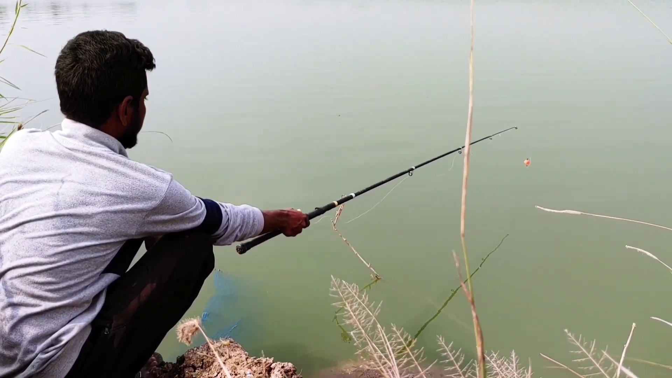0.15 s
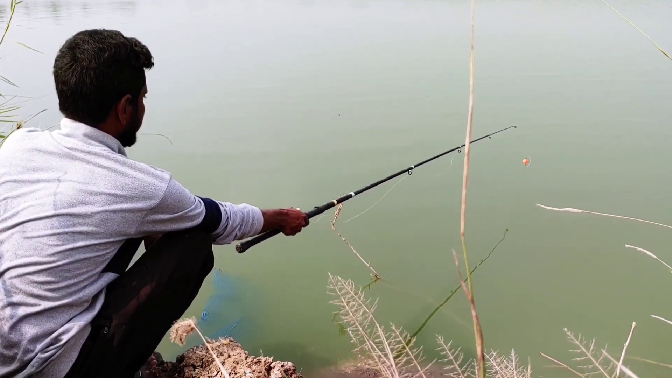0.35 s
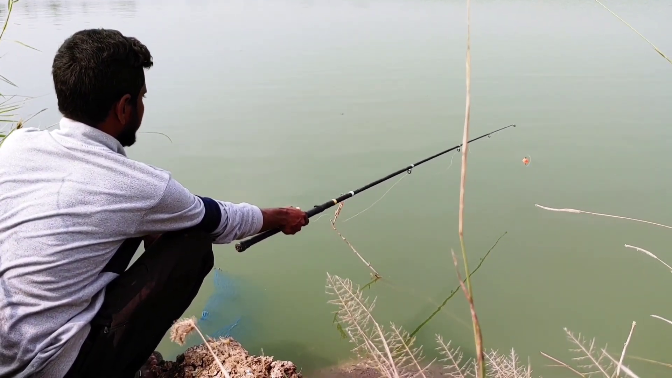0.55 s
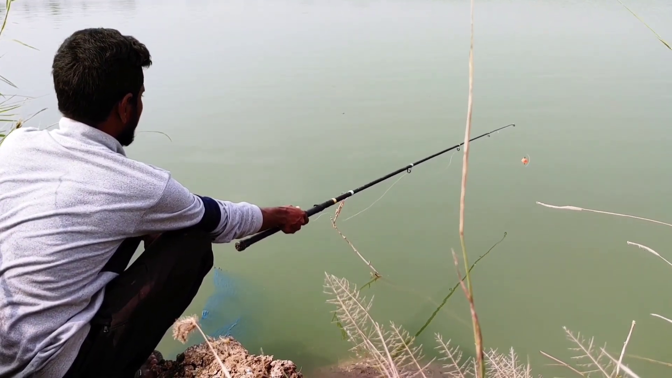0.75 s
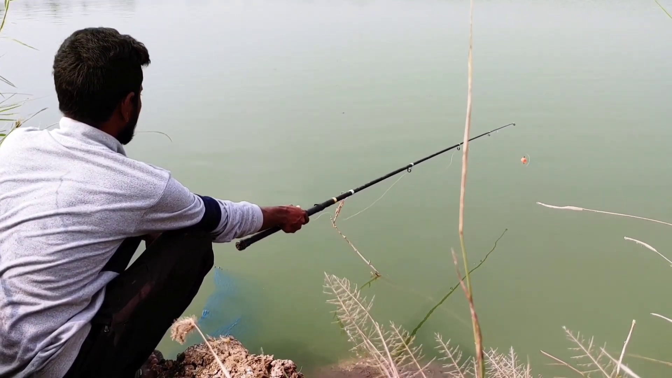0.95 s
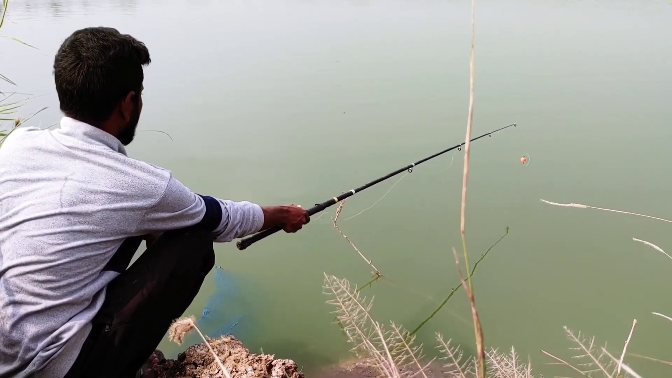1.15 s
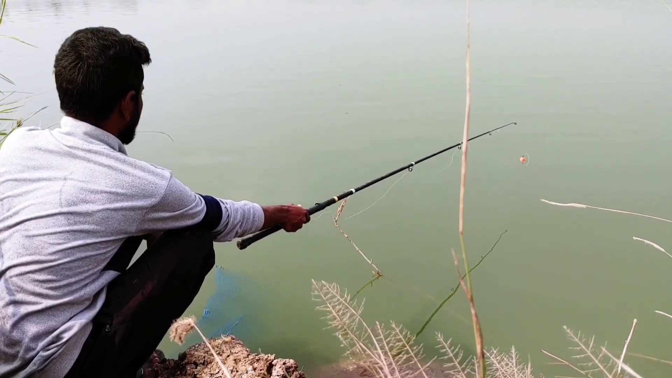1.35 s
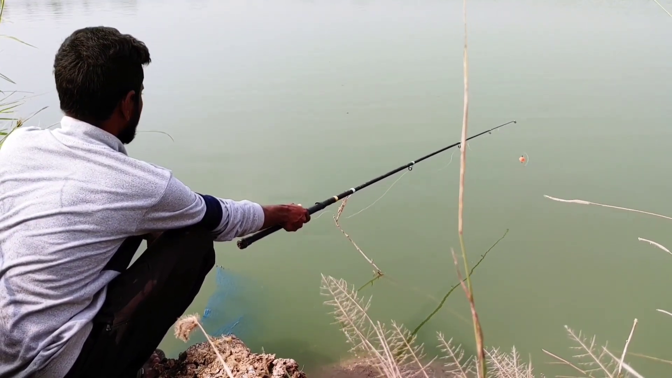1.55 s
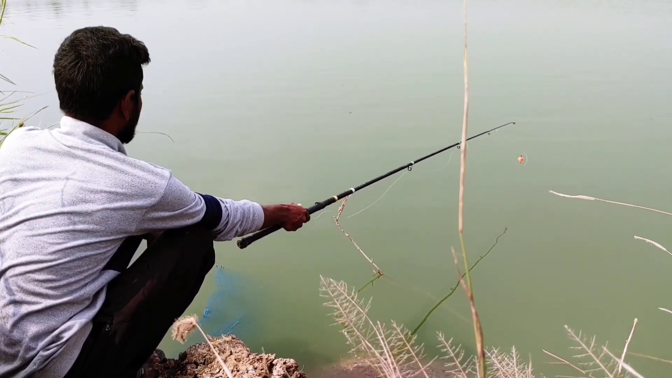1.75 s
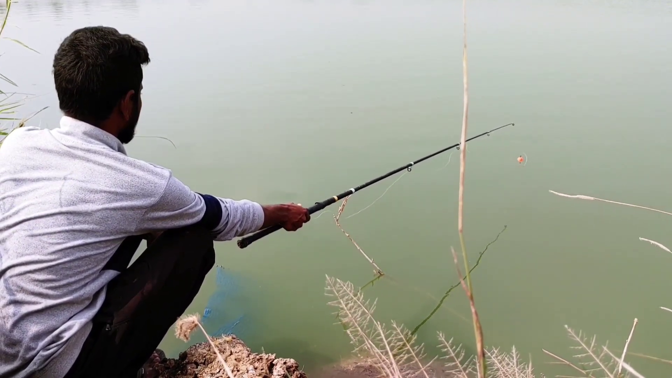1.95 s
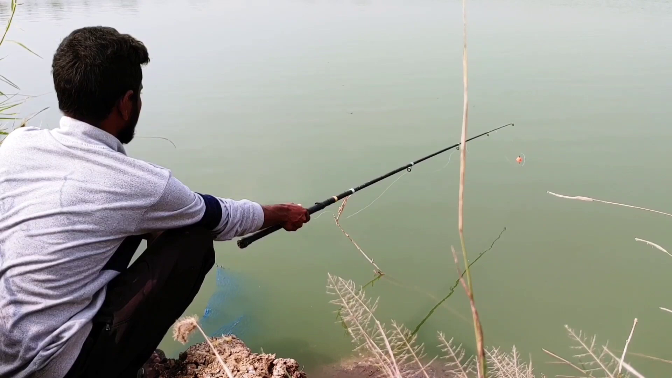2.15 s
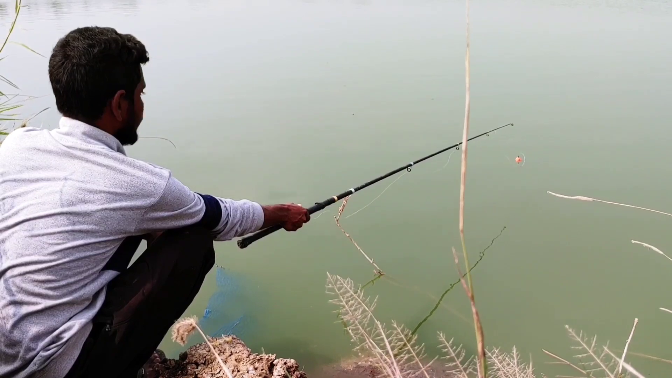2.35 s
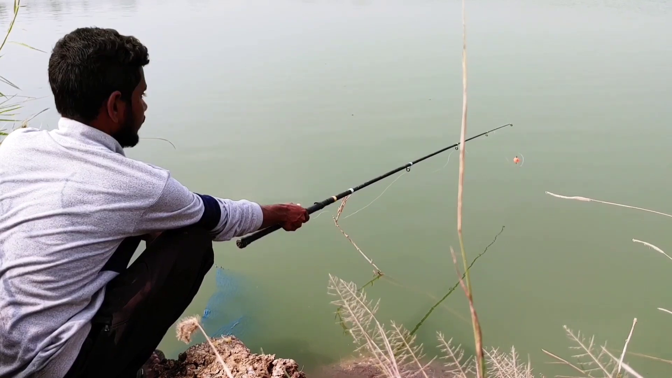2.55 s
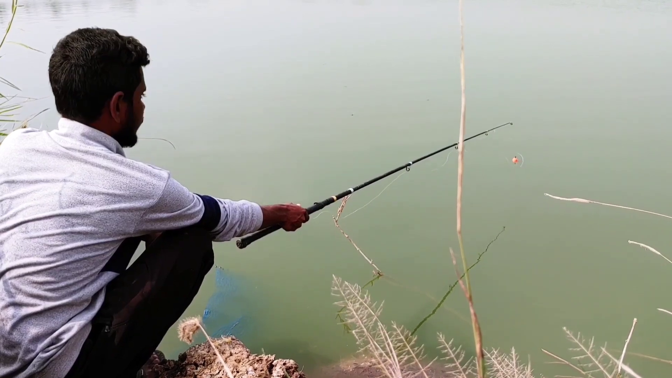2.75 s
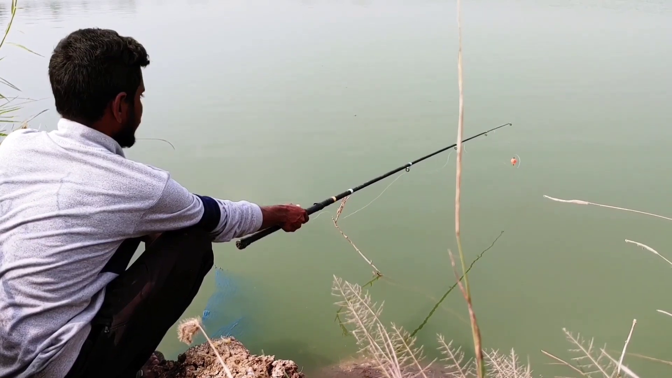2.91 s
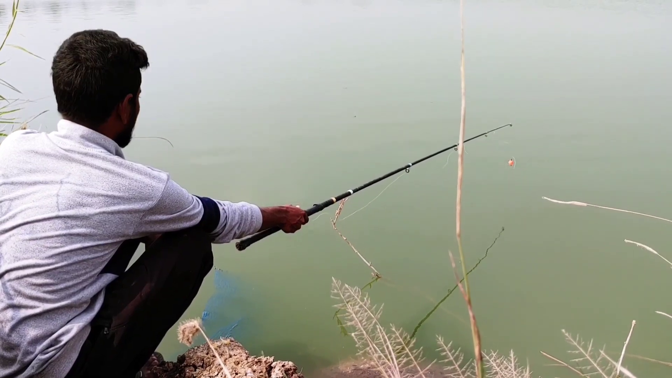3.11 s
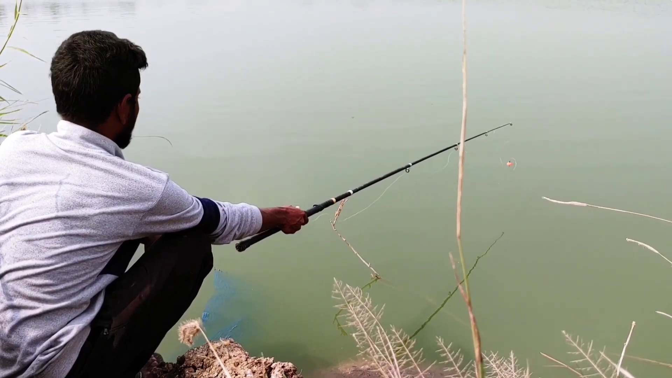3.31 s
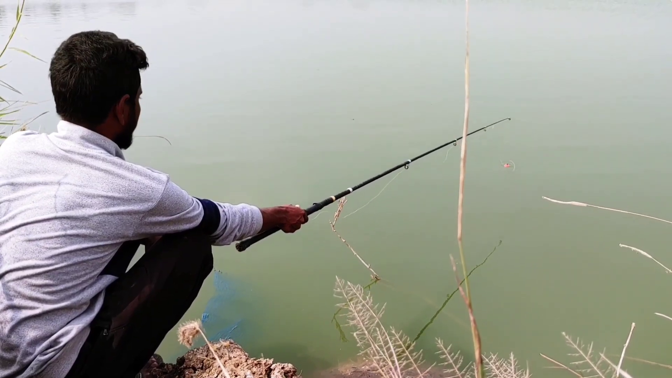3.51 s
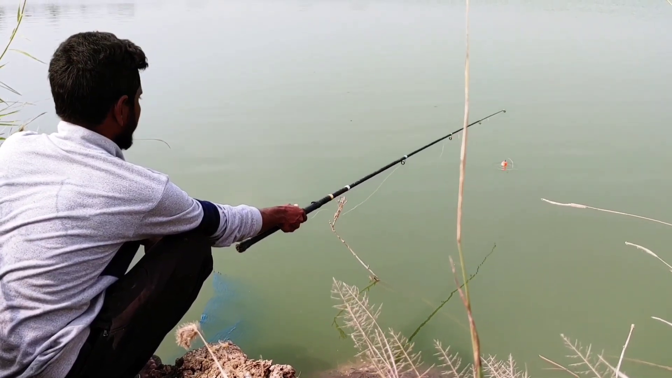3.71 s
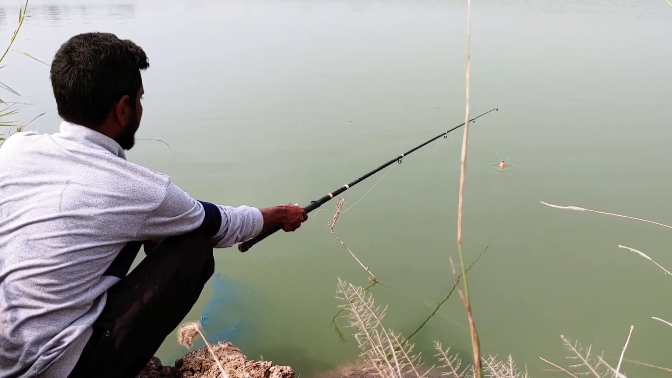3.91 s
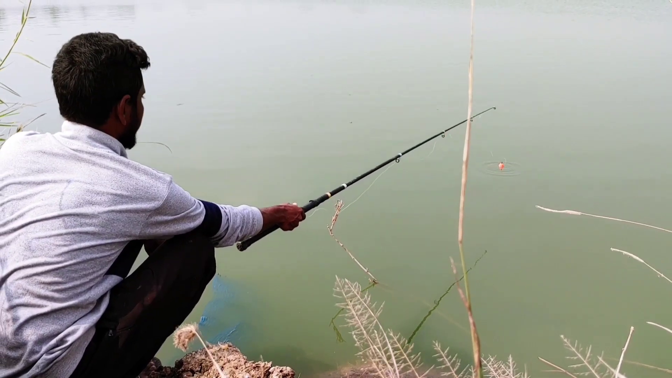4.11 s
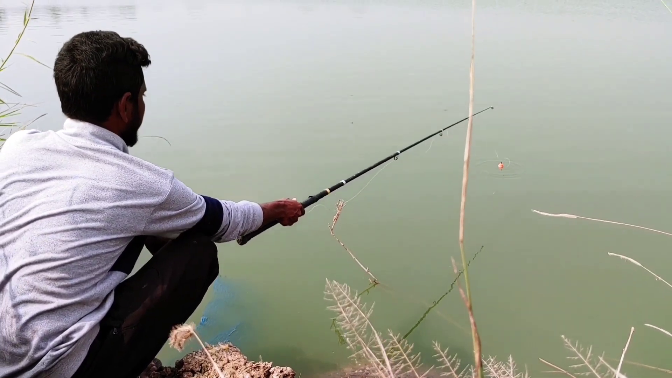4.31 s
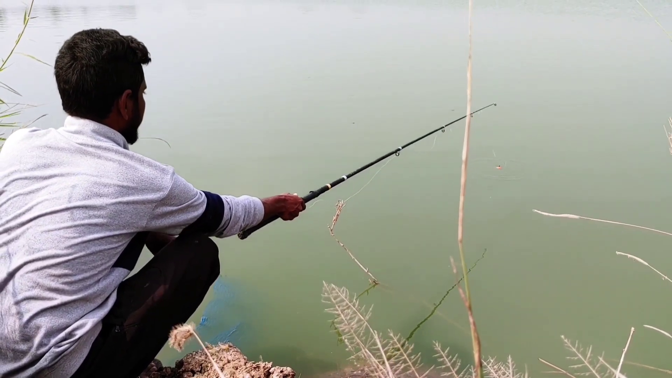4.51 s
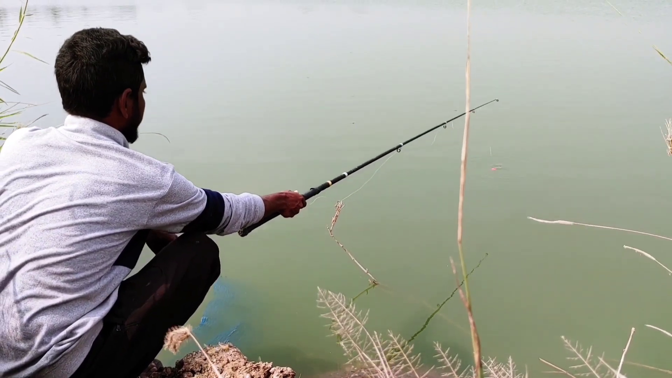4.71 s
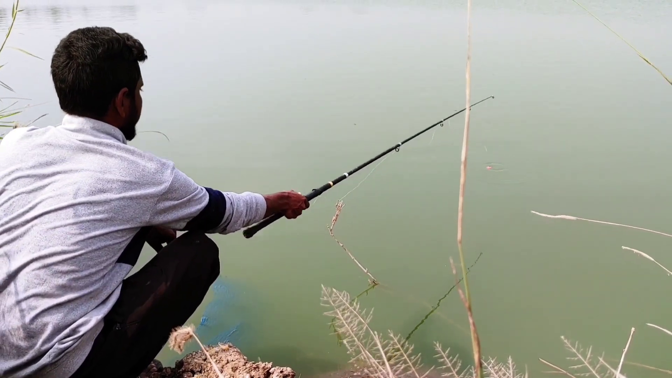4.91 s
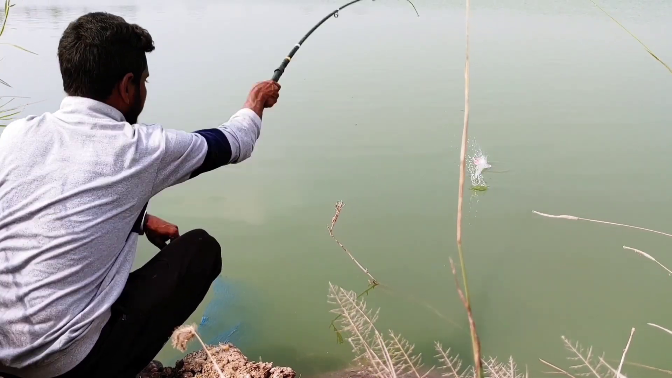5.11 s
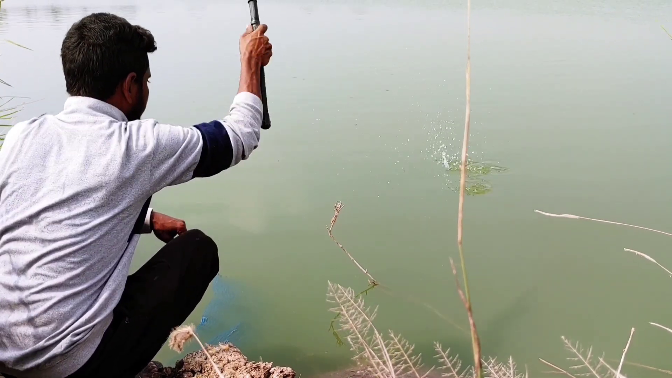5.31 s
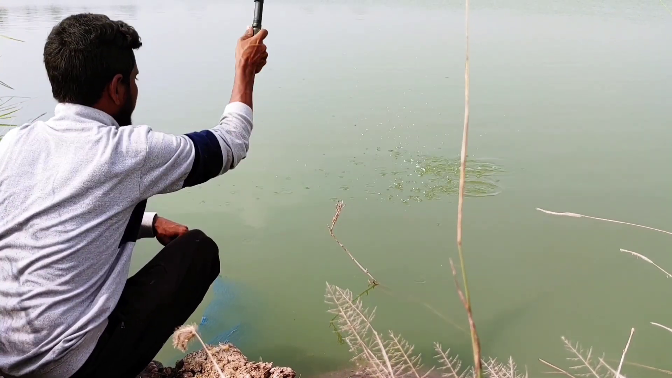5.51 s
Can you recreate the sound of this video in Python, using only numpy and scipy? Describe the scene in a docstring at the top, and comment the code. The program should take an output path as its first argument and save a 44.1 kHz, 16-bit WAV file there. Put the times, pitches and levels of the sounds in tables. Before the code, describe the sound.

Outdoors at a calm lake, a soft low rumble, distant engine hum and airy hiss run throughout. Faint birds twitter in the first second. Near two and three seconds, water splashes, plops and drips close on the right, then eases. Around five seconds a line tears from the water ahead in several crisp, louder splashes. Stereo microphone near the bank.

```python
"""Water splashes at a quiet lake edge: bubble clouds and torn-water hiss gulp, froth and spray.
It is stirred at the bank off to the right, with ringing plops and dripping drops.
Then an angler strikes, and the line tears out of the lake ahead in a few sharp splashes.
Behind it lie a low distant rumble of filtered noise with a far engine's hum of sines, soft airy noise,
and twittering birds made of warbled and falling tones."""
import sys
import numpy as np
from scipy import signal
from scipy.fft import rfft, irfft, next_fast_len
from scipy.io import wavfile
from scipy.ndimage import uniform_filter1d, map_coordinates

SR = 44100
rng = np.random.default_rng(int(sys.argv[2]) if len(sys.argv) > 2 else 0)


def master(y):
    """Save y as 16-bit WAV."""
    cut = np.clip(np.atleast_2d(y).T, -1, 1)
    pcm = np.round(cut * 32767)  # scale
    wavfile.write(sys.argv[1], SR, pcm.astype(np.int16))


N = 245240
STRIKE_S = 4.8  # the water sounds at the bank before the strike, around the line from then on
# Spells of churning water. Each row: start in seconds, end in seconds, spray level in dB,
# depth (gulp over spray) in dB, sag in dB per second.
CHURN_SPELLS = [(1.88, 2.68, -52.5, 1, 9.5), (3.17, 3.61, -52.5, -5.5, 0), (3.68, 3.95, -68.5, -20, -16.5),
                (4.03, 4.38, -65, -11, 2), (5.03, 5.56, -49.5, -7, 2.5)]


def amp(db):
    """Decibels to gain."""
    return 10 ** (np.asarray(db) / 20)


def unit(x):
    """Scale so that the centre of the image has rms 1."""
    centre = np.atleast_2d(x).mean(0)
    return x / np.sqrt(np.mean(centre ** 2) + 1e-20)


def along(points, hz):
    """Read a curve of (Hz, value) points on a log frequency axis."""
    f, v = np.transpose(points)
    return np.interp(np.log(hz + 1), np.log(f + 1), v)


def wobble(rate):
    """A smooth random curve through the given number of knots a second."""
    knots = rng.standard_normal(int(N * rate / SR) + 4)
    return map_coordinates(knots, [np.arange(N) * rate / SR])


def filtered(x, response):
    """Shape x by a complex response of frequency."""
    m = next_fast_len(N + SR // 2)
    return irfft(rfft(x, m) * response(np.fft.rfftfreq(m, 1 / SR)), m)[..., :N]


def band(hz, lo, hi, order=6):
    """Gain of a soft-edged pass band."""
    low_edge = 1 + (lo / (hz + 1)) ** (2 * order)
    high_edge = 1 + (hz / hi) ** (2 * order)
    return 1 / np.sqrt(low_edge * high_edge)


def add(track, s, sound):
    """Lay a sound into a track at time s in seconds."""
    part = track[max(round(s * SR), 0):][:len(sound)]
    part += sound[:len(part)]


def background():
    """Distant rumble and an engine's steady hum reach both ears nearly alike; the soft air does not."""
    # Colour of the rumble. Each row: frequency in Hz, level in dB per Hz.
    rumble_colour = [(20, -10), (35, -16), (60, -4.5), (110, -4), (160, -4), (200, -12.5), (260, -15.5),
                     (400, -23), (650, -52)]
    # The far engine's overtones. Each row: frequency in Hz, level in dB.
    overtones = [(57.7, -70), (72.2, -80.5), (101, -67), (144.3, -61), (173.2, -64), (230.9, -76.5)]
    # Colour of the air. Each row: frequency in Hz, level in dB per Hz.
    air_colour = [(210, -4), (350, -6), (480, -6), (600, -4.5), (1510, -13), (1850, -14), (2580, -15),
                  (6380, -20.5), (7360, -30.5), (10800, -17.5), (15500, -24.5)]
    # Stereo lean of the air. Each row: frequency in Hz, left over right in dB.
    air_lean = [(60, -5), (180, -5), (550, -3), (1650, -0.5), (4970, -4.5), (15000, -3)]
    rumble_db, air_db = -58.5, -63

    low = rng.standard_normal(N) + 0.22 * rng.standard_normal((2, N))
    rumble = unit(filtered(low, lambda hz: amp(along(rumble_colour, hz))))
    rumble = amp(rumble_db + 1.1 * wobble(2.6)) * rumble

    t = np.arange(N) / SR + 0.0004 * wobble(2.9)  # the engine's speed drifts a little
    hum = sum(amp(db) * np.sin(2 * np.pi * (hz * t + rng.random())) for hz, db in overtones)
    hum = amp(wobble(2.97)) * hum

    wide = 0.25 * rng.standard_normal(N) + rng.standard_normal((2, N))
    ears = np.array([[.5], [-.5]])
    air = unit(filtered(wide, lambda hz: amp(along(air_colour, hz) + ears * along(air_lean, hz))))
    return rumble + hum + amp(air_db + 0.95 * wobble(3.0)) * air


def scattered(x, t60):
    """Diffuse answer of bank and reeds: a decaying noise tail, different at each ear."""
    t = np.arange(SR // 3) / SR
    tail = rng.standard_normal((2, len(t))) * amp(-60 * t / t60)
    tail = tail / np.linalg.norm(tail, axis=1, keepdims=True)
    return signal.fftconvolve(np.atleast_2d(x), tail, axes=1)[:, :N]


def bird(warble_hz=65):
    """Short warbled notes and a few thin falling whistles, softened by distance."""
    # Overlapping notes. Each row: start in seconds, length in seconds, pitch in Hz,
    # level in dB ahead of the distance gains.
    note_rows = [(.055, .07, 2430, -62.5), (.11, 0.12, 2890, -65), (.135, 0.054, 2660, -61),
                 (.285, 0.046, 2820, -59.5), (.3, 0.16, 2540, -65), (.49, 0.076, 2830, -61),
                 (.575, 0.082, 2440, -62), (.61, 0.05, 2780, -64), (.79, 0.065, 2800, -64),
                 (.865, 0.067, 2460, -57), (.91, 0.066, 2750, -65), (.97, 0.043, 2810, -61),
                 (1.07, 0.104, 2775, -67)]
    # Far whistles. Each row: start in seconds, length in seconds, starting pitch in Hz,
    # fall over the length in Hz, level in dB ahead of the distance gains.
    whistle_rows = [(1.762, 0.08, 3785, 230, -60), (2.27, 0.08, 2056, 140, -50),
                    (2.43, 0.057, 2020, 140, -49), (2.48, 0.15, 2090, 430, -54.5),
                    (3.98, 0.46, 1424, 9.5, -64)]
    song = np.zeros(N)
    level_notes = [(s, span, hz, 0, db) for s, span, hz, db in note_rows]
    for rows, warble in ((level_notes, warble_hz), (whistle_rows, 0)):
        for s, span, hz, fall_hz, db in rows:
            t = np.arange(int(span * SR)) / SR
            flutter = np.interp(t, np.linspace(0, span, 24), rng.standard_normal(24))
            vibrato = np.sin(2 * np.pi * (30 * t + rng.random()))
            pitch = hz - fall_hz * t / span + warble * (vibrato + flutter)
            tone = np.sin(2 * np.pi * np.cumsum(pitch) / SR)
            add(song, s, amp(db) * np.hanning(len(t)) * tone)
    return .35 * song + .7 * scattered(song, t60=.3)


def glancing(x, t60):
    """Short reflections off moving water, never twice the same and different at each ear."""
    z = signal.stft(x, nperseg=1024)[2]
    decay = amp(-60 * np.arange(2 * z.shape[-2] - 2) / SR / t60)
    # a fresh random tail for every frame and ear
    tails = rng.standard_normal((2, z.shape[-1], len(decay))) * decay / np.linalg.norm(decay)
    return signal.istft(z * rfft(tails).swapaxes(1, 2))[1][:, :N]


def placed(x, lag_ms, balance, near_db):
    """The direct sound reaches the left ear lag_ms later; close ground and far bank answer."""
    ears = np.array([[.5], [-.5]])
    direct = filtered(x, lambda hz: np.exp(-2j * np.pi * hz * ears * lag_ms / 1000))
    # long waves pass round stones and reeds, short ones scatter
    short_waves = filtered(x, lambda hz: band(hz, 1300, SR, order=1))
    near = amp(near_db) * glancing(short_waves, t60=.016)
    far = amp(-23) * scattered(x, t60=.2)
    return filtered(direct + near + far, lambda hz: amp(ears * along(balance, hz)))


def at_bank(x):
    """Close by on the right: the right ear hears it earlier and mostly louder."""
    # Each row: frequency in Hz, left over right in dB.
    bank_lean = [(200, -0.5), (500, -2.5), (1000, -2.5), (1300, 2.5), (1900, 1.5), (2400, -5), (3400, 0.5),
                 (4300, -7), (5000, -10.5), (6200, -14.5), (8500, -1.5), (10800, -14.5), (15000, -10.5)]
    return placed(x, lag_ms=0.394, balance=bank_lean, near_db=0.0)


def at_line(x):
    """Out on the water ahead: almost no lag between the ears."""
    # Each row: frequency in Hz, left over right in dB.
    line_lean = [(200, -0.5), (700, -4), (1100, -4), (1700, -2), (2500, -5), (3600, -2.5), (5000, -13.5),
                 (6500, -7), (8300, -5), (11000, -12), (15000, -7)]
    return placed(x, lag_ms=-0.03, balance=line_lean, near_db=4.0)


def churning(churns):
    """Spray level and depth of each spell in dB: it builds up, sags or swells, and dies away."""
    attack_s, release_s = 0.077, 0.25  # each over 20 dB
    settling = 3.6  # large bubbles react most: depth changes this many times as fast as the spray
    t = np.arange(N) / SR
    for start, end, db, depth_db, sag in churns:
        sunk = sag * np.clip(t - start, 0, end - start)
        outside = np.maximum(start - t, 0) / attack_s + np.maximum(t - end, 0) / release_s
        yield db - sunk - 20 * np.minimum(outside, 10), depth_db - settling * sunk


def light_drops(scatter_db=4):
    """Drops fall at uneven gaps, as heavy as the water churns: rows laid out like the heavy drops."""
    drips_per_s = 18
    ring_db, tick_db = 10, 2  # over the spray level, ahead of the trims in plops_and_drips
    middle_hz, pitch_spread = 4400, 0.14  # the spread is relative
    spray_db = np.max([db for db, _ in churning(CHURN_SPELLS)], axis=0)
    count = int(drips_per_s * N / SR)
    slip, size = rng.random((count, 2)).T
    s = (np.arange(count) + slip) / drips_per_s
    hz = middle_hz * np.exp(pitch_spread * rng.standard_normal(count))
    db = spray_db[(s * SR).astype(int)] + scatter_db * (2 * size - 1)
    return list(zip(s, hz, db + ring_db, db + tick_db))


def plops_and_drips(glide=2, onset=0.00084, drip_t60=0.0059, tick_t60=0.007, drip_glide=4):
    """Trapped air rings and rises in pitch; a drop ticks on the surface and leaves a tiny bubble."""
    # Single ringing bubbles. Each row: start in seconds, pitch in Hz, level in dB ahead of a 2 dB trim.
    bubbles = [(1.358, 620, -46.5), (1.824, 255, -41.5), (1.864, 923, -25.5), (1.869, 312, -35),
               (1.871, 690, -32), (1.888, 547, -30.5), (1.894, 322, -29.5), (1.936, 380, -40),
               (1.964, 376, -39), (1.971, 699, -38), (2.001, 2165, -37), (2.012, 2260, -39),
               (2.083, 2360, -38.5), (2.205, 690, -44), (2.706, 4970, -36.5), (3.112, 390, -38.5),
               (3.147, 690, -37.5), (3.164, 1165, -35.5), (3.18, 265, -39.5), (3.187, 730, -43),
               (3.203, 194, -45), (3.246, 267, -38.5), (3.28, 210, -44), (3.291, 2160, -29.5),
               (3.294, 1012, -42), (3.296, 710, -48), (3.338, 699, -40), (3.339, 910, -40),
               (3.376, 595, -37), (3.387, 357, -42), (3.448, 284, -44), (3.489, 228, -40),
               (3.503, 251, -42), (3.542, 360, -40), (3.561, 306, -40.5), (3.591, 310, -44),
               (5.067, 1770, -24), (5.071, 635, -28), (5.072, 256, -35.5), (5.077, 1520, -26),
               (5.081, 2637, -22), (5.084, 984, -24.5), (5.093, 1970, -26), (5.125, 1070, -35),
               (5.149, 1144, -29), (5.182, 1820, -35.5), (5.185, 1610, -31.5), (5.338, 217, -42.5)]
    # The heaviest drops. Each row: start in seconds, pitch in Hz, ring level in dB ahead of a 7 dB trim,
    # tick level in dB ahead of a 5 dB trim.
    heavy_drops = [(1.861, 6100, -34, -12), (2.0216, 4760, -29, -50), (2.1335, 4780, -39, -34),
                   (2.1458, 4390, -34, -33), (2.1944, 4560, -23, -33), (2.2708, 4700, -20.5, -30),
                   (2.4441, 4600, -34, -52), (2.4753, 4390, -39, -31), (2.6607, 4220, -28, -50),
                   (3.0086, 4520, -40, -21.5), (3.0205, 4500, -16, -46), (3.1178, 4450, -31, -46),
                   (3.147, 5190, -35, -53), (3.2378, 4500, -32, -17.5), (3.2703, 4360, -22, -43),
                   (3.2859, 4565, -16.5, -40), (3.3357, 4050, -21, -47), (3.4331, 4320, -21, -44),
                   (3.5392, 4500, -25.5, -36), (3.6006, 4435, -25.5, -51), (3.644, 4580, -19, -51),
                   (3.8567, 4730, -32.5, -45), (4.3384, 4750, -36.5, -45), (5.015, 5000, -48, -32),
                   (5.068, 4800, -12, -19), (5.243, 4870, -36, -42), (5.289, 4860, -24, -24),
                   (5.312, 5630, -36, -25), (5.3586, 6180, -4.5, -16), (5.419, 4920, -23, -29.5),
                   (5.433, 6600, -29, -37), (5.458, 5500, -29, -31)]
    bank, line = np.zeros(N), np.zeros(N)
    t = np.arange(SR // 6) / SR
    for s, hz, db in bubbles:
        # a 1 kHz bubble rings 0.049 s down to -60 dB; smaller, higher ones die sooner
        t60 = 0.049 * (1000 / hz) ** 0.63
        ring = np.sin(2 * np.pi * hz * t * (1 + glide * t)) * (1 - np.exp(-t / onset))
        add(bank if s < STRIKE_S else line, s, amp(db - 2.0 - 60 * t / t60) * ring)
    highs = signal.butter(2, [3400, 15500], "bandpass", fs=SR, output="sos")
    for s, hz, db, tick_db in list(heavy_drops) + light_drops():
        hiss = signal.sosfilt(highs, rng.standard_normal(len(t)))
        tick = hiss * amp(tick_db - 5 - 60 * t / tick_t60)
        tone = np.sin(2 * np.pi * hz * t * (1 + drip_glide * t))
        ring = tone * amp(db - 7.0 - 60 * t / drip_t60)
        add(bank if s < STRIKE_S else line, s, (tick + ring) * (1 - np.exp(-t / 0.00014)))
    return at_bank(bank) + at_line(line)


def bubble_cloud(rate, lo_hz, hi_hz, cycles, spread_db, hiss, width):
    """Many small bubbles, each a damped rising tone, over the wider hiss of torn water."""
    count = int(rate * N / SR)
    when, size, strength = rng.random((count, 3)).T[:, :, None]
    hz = lo_hz * (hi_hz / lo_hz) ** size
    k = np.arange(min(int(cycles * SR / lo_hz), 2000))
    age = k * hz / SR / cycles  # 1 after the given number of cycles
    tone = np.sin(2 * np.pi * cycles * age * (1 + 0.031 * np.minimum(age, 2)))
    ring = tone * (1 - np.exp(-age * cycles))
    # most bubbles are weak and a few strong; the high ones are louder
    grain_db = -spread_db * np.log(1 - strength * 49 / 50) - 48.0 * age
    grains = hz / hi_hz * amp(grain_db) * ring
    places = ((when * N).astype(int) + k).ravel()
    cloud = unit(np.bincount(places, grains.ravel(), N)[:N])
    cloud = cloud + hiss * rng.standard_normal(N) + width * rng.standard_normal((2, N))
    # the flow keeps feeding the cloud, so its strength stays even from moment to moment
    power = uniform_filter1d(np.mean(cloud ** 2, axis=0), size=700)
    return cloud / np.sqrt(np.abs(power) + 1e-6)


def flow(churns, splashes):
    """Strength of gulp, froth and spray: churning spells plus splashes that swell and collapse."""
    rise_share = 0.32  # a splash swells in this share of the time it takes to fall by 20 dB
    depth_share = np.array([[1], [0.5], [0]])  # froth lies halfway from spray to gulp
    lift_db = np.array([[0], [-0.5], [0]])
    t = np.arange(N) / SR

    def layers(db, depth_db):
        return amp(db + depth_share * depth_db + lift_db)

    power = sum(layers(db, depth_db) ** 2 for db, depth_db in churning(churns))
    for crest, db, depth_db, length in splashes:
        away = np.maximum((crest - t) / rise_share, t - crest) / length
        power += (layers(db, depth_db) * amp(-20 * np.minimum(away, 10))) ** 2
    return np.sqrt(power)


def water(churns, splashes, colour, place):
    """Large bubbles gulp, middling ones froth, and fine spray fizzes on the surface."""
    gulp = bubble_cloud(rate=260, lo_hz=220, hi_hz=950, cycles=9, spread_db=3, hiss=.8, width=.45)
    froth = bubble_cloud(rate=1500, lo_hz=900, hi_hz=3600, cycles=16, spread_db=3.6, hiss=.9, width=.7)
    spray = bubble_cloud(rate=3200, lo_hz=3500, hi_hz=13000, cycles=18, spread_db=4.6, hiss=.85, width=.8)
    edges_hz = [(170, 900), (900, 3500), (3500, 17000)]
    layers = []
    for cloud, (lo, hi) in zip((gulp, froth, spray), edges_hz):
        coloured = filtered(cloud, lambda hz: amp(along(colour, hz)) * band(hz, lo, hi))
        layers.append(unit(place(coloured)))
    clumps = amp(0.19 * wobble(110))  # water falls back in uneven lumps
    return clumps * sum(strength * layer for strength, layer in zip(flow(churns, splashes), layers))


def scene():
    """Water stirs at the bank before the strike and around the line after it, over the open air."""
    # A deep splash gulps, a shallow one only sprays. Each row: crest in seconds, spray level in dB,
    # depth (gulp over spray) in dB, time to fall by 20 dB in seconds.
    splashes = [(.42, -66.5, 3, 0.12), (.455, -64, 8, 0.013), (1.868, -33, -9.5, 0.082),
                (1.899, -45.5, 6, 0.053), (2.01, -55, 3, 0.045), (2.151, -41, -20.5, 0.072),
                (2.2, -46.5, -7.5, 0.056), (2.248, -47, -4.5, 0.13), (2.272, -36.5, -15.5, 0.022),
                (2.282, -37, -11, 0.011), (2.48, -55, -9, 0.54), (3.026, -29.5, -25.5, 0.014),
                (3.036, -45, -9, 0.082), (3.186, -49.5, 4, 0.029), (3.241, -33, -13, 0.0054),
                (3.295, -39, -6.5, 0.033), (3.38, -57, 12, 0.026), (3.57, -50, -32, 0.06),
                (3.647, -49, -30, 0.011), (3.998, -56, -26, 0.022), (4.195, -53.5, -10, 0.063),
                (4.34, -55.5, -5, 0.067), (5.0, -47, -24, 0.016), (5.016, -36.5, -33, 0.013),
                (5.074, -23.5, -13.5, 0.046), (5.094, -34, -10.5, 0.046), (5.152, -24, -18, 0.017),
                (5.290, -34, -16.5, 0.047), (5.302, -30, -36, 0.022), (5.323, -30, -43, 0.0084),
                (5.343, -39, -5, 0.016), (5.352, -24.5, -26, 0.018), (5.361, -20.5, -24, 0.012),
                (5.371, -32.5, -14, 0.019), (5.402, -40, -35, 0.015), (5.422, -37, -34, 0.022),
                (5.437, -40.5, -11, 0.0075), (5.529, -35, -23, 0.04)]
    # Colour of the water at the bank. Each row: frequency in Hz, level in dB per Hz.
    bank_colour = [(170, 10.5), (260, -3.5), (370, -2), (500, -7.5), (680, -0.5), (820, -4.5), (1000, 0.5),
                   (1250, -2), (1550, -2.5), (1900, -6.5), (2300, -5.5), (3000, -10.5), (3700, -3.5),
                   (4700, -3.5), (5700, -12), (7400, -17), (9000, -13.5), (10600, -9.5), (12500, -19.5),
                   (15300, -28.5)]
    # Colour of the water around the line. Each row: frequency in Hz, level in dB per Hz.
    line_colour = [(170, 7.5), (240, -7.5), (430, -17), (640, -8.5), (790, -11.5), (1050, -2), (1350, -8.5),
                   (1750, -5.5), (2200, -7), (2800, -4.5), (3500, -1.5), (4900, 1), (6300, -2.5),
                   (7600, -7.5), (9000, -3.5), (10800, 0.5), (13000, -10), (15300, -10)]

    def before(rows):
        return [row for row in rows if row[0] < STRIKE_S]

    def after(rows):
        return [row for row in rows if row[0] >= STRIKE_S]

    bank = water(before(CHURN_SPELLS), before(splashes), bank_colour, at_bank)
    line = water(after(CHURN_SPELLS), after(splashes), line_colour, at_line)
    return bank + line + bird() + background() + plops_and_drips()


def record(dry):
    """The recorder keeps nothing above its band limit of 15.7 kHz."""
    return filtered(dry, lambda hz: hz < 15700)


dry = scene()
out = record(dry)
master(out)
```